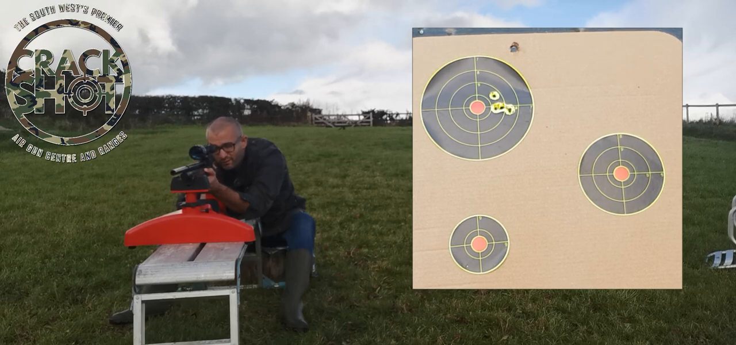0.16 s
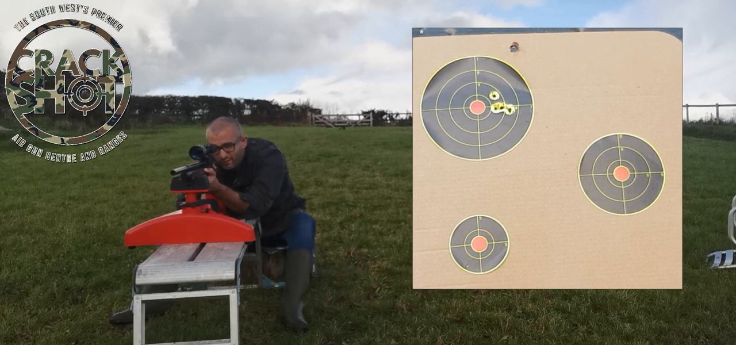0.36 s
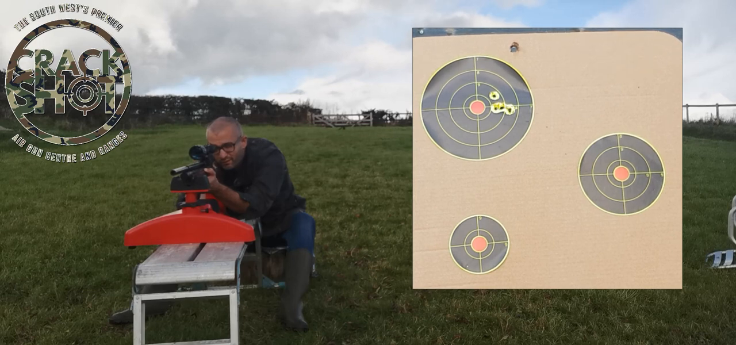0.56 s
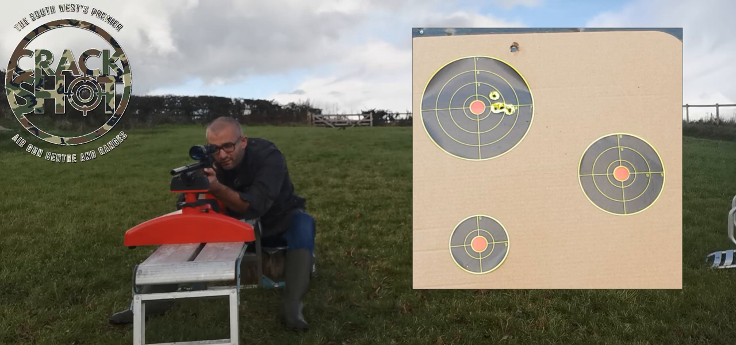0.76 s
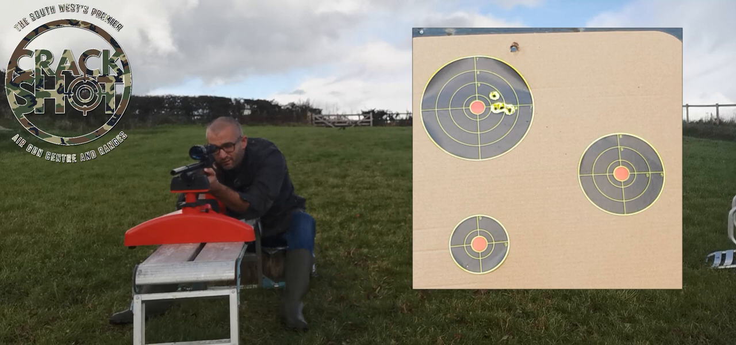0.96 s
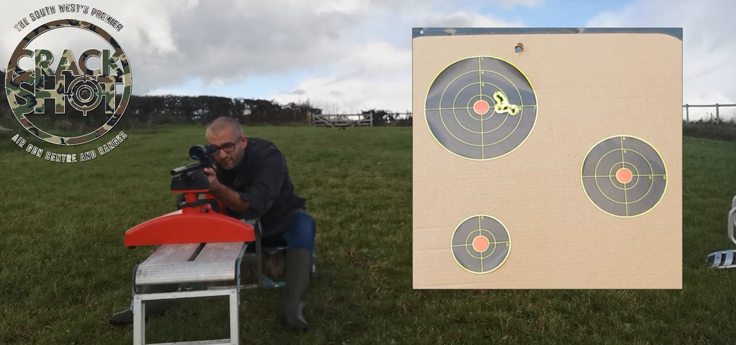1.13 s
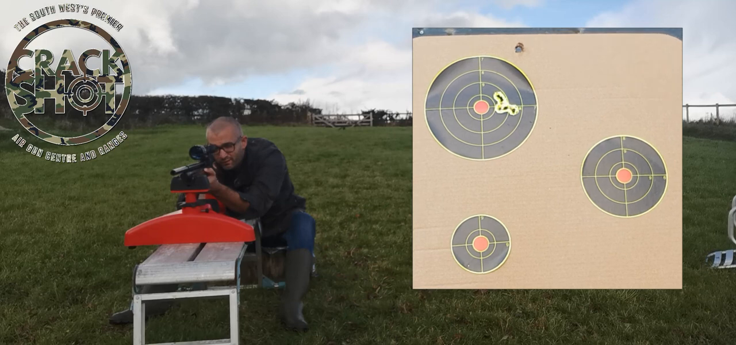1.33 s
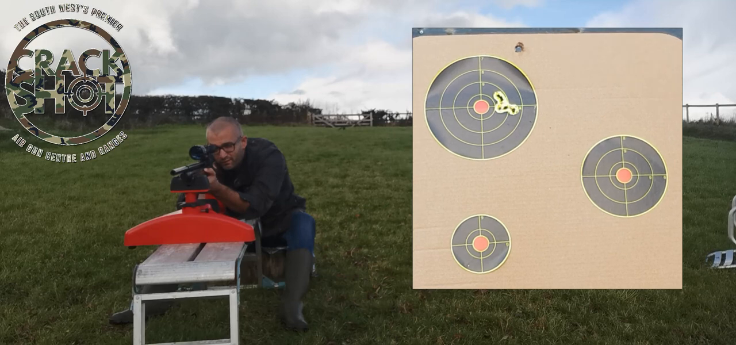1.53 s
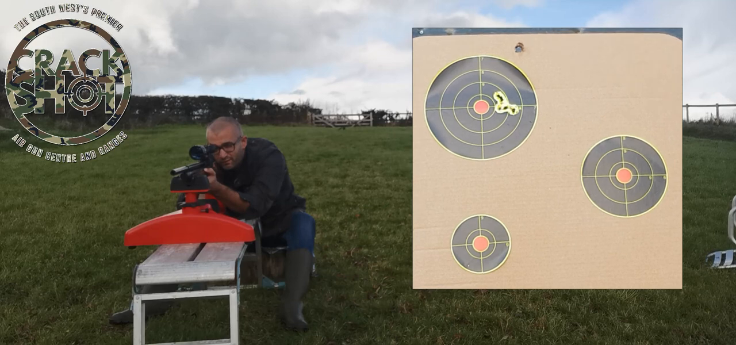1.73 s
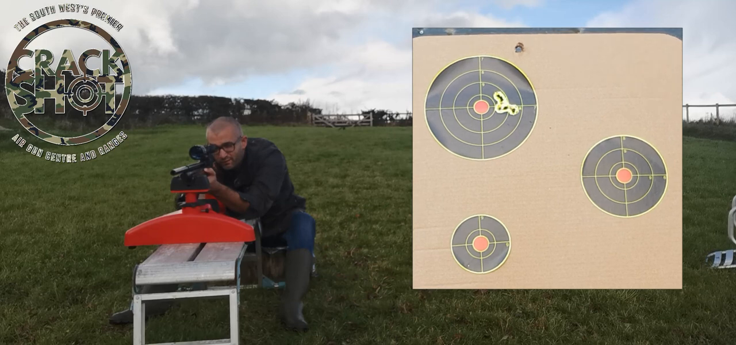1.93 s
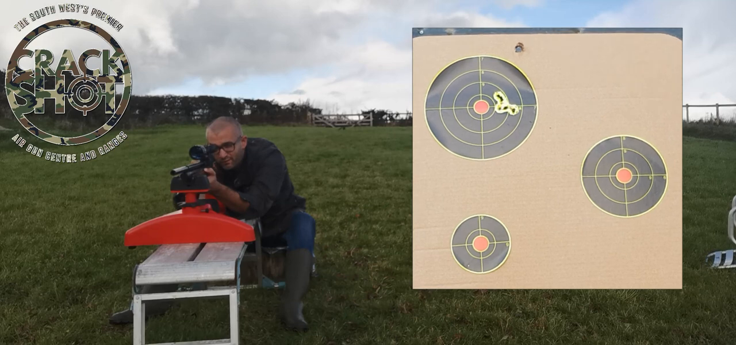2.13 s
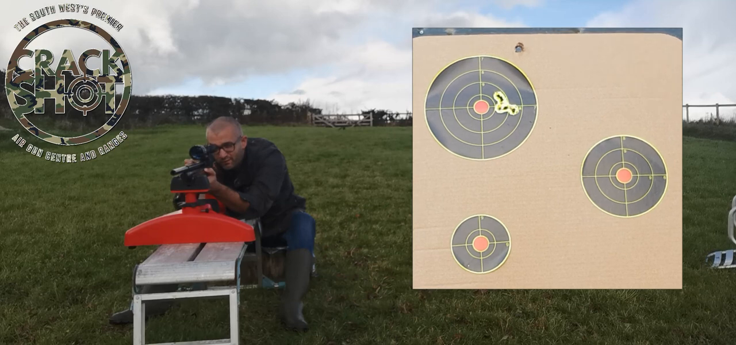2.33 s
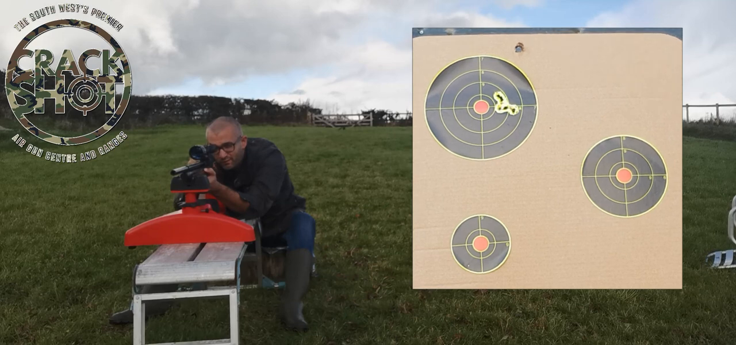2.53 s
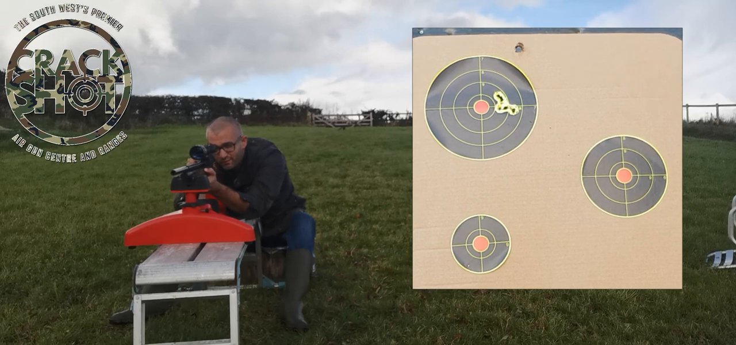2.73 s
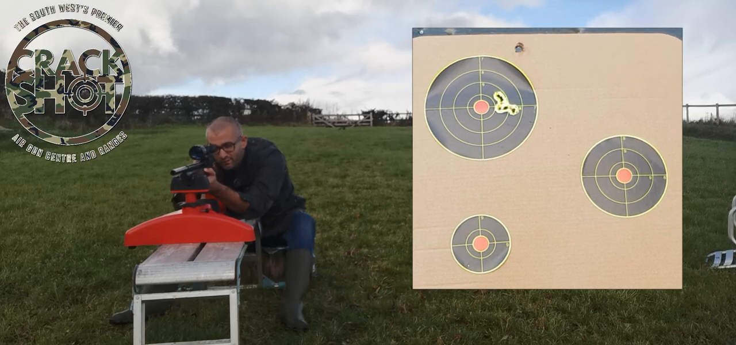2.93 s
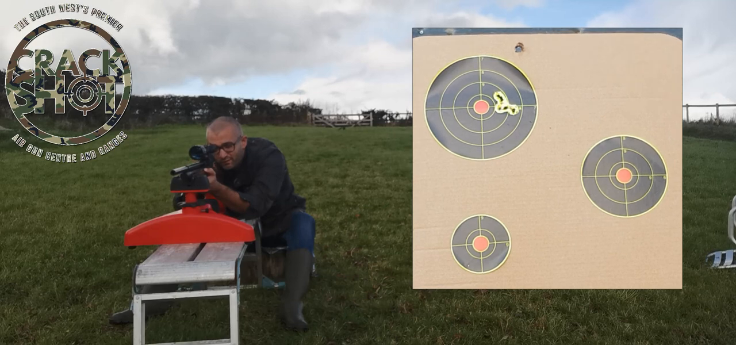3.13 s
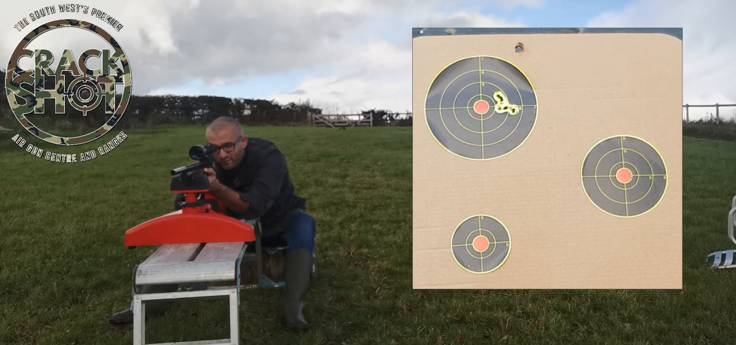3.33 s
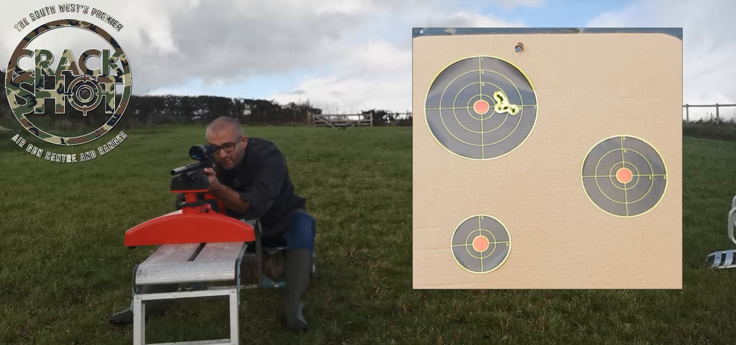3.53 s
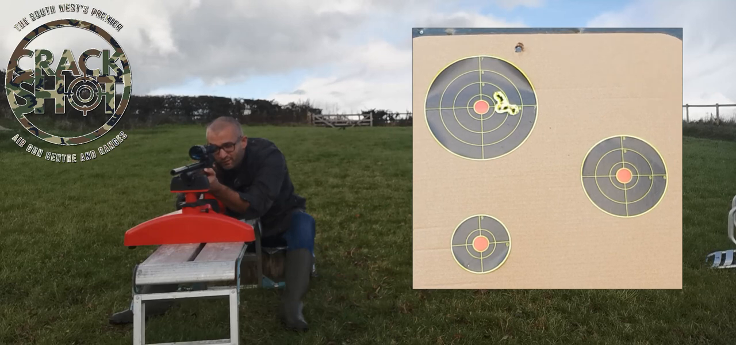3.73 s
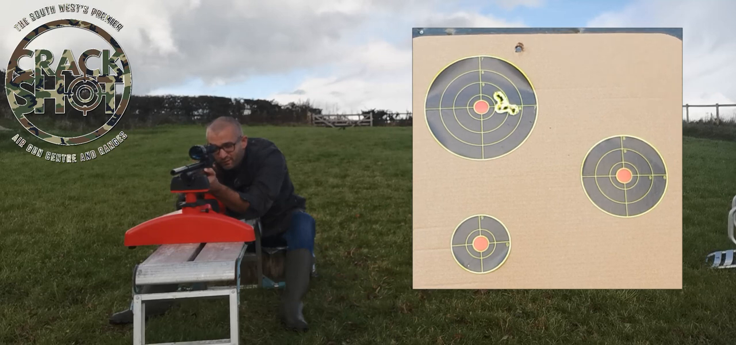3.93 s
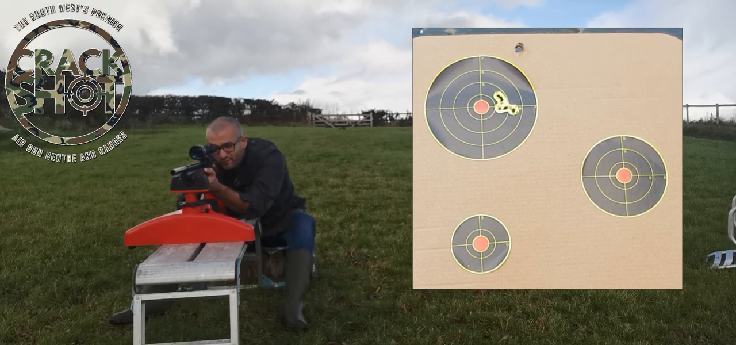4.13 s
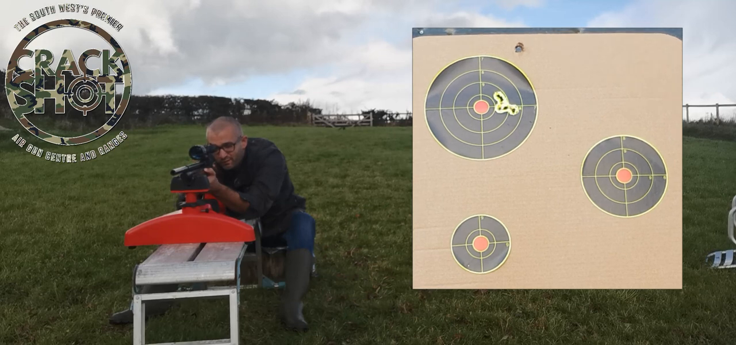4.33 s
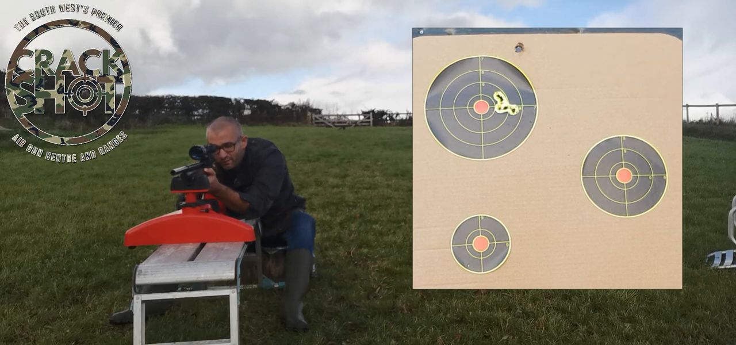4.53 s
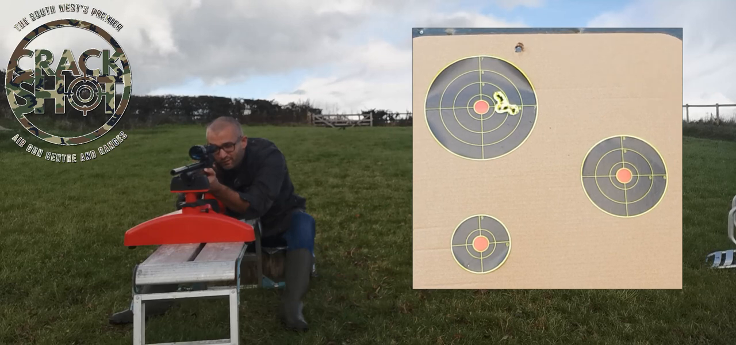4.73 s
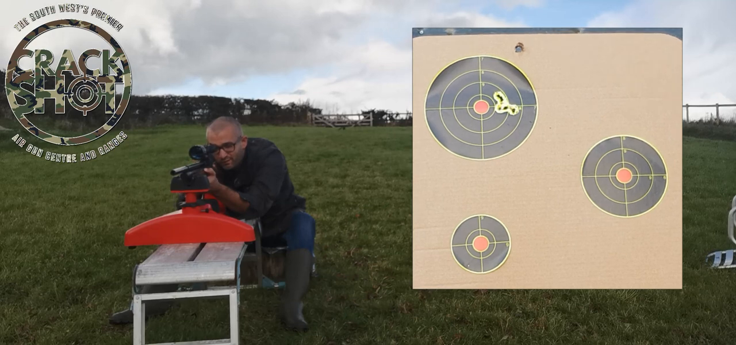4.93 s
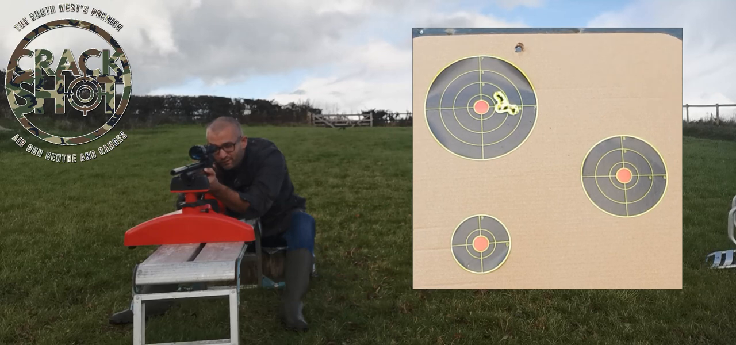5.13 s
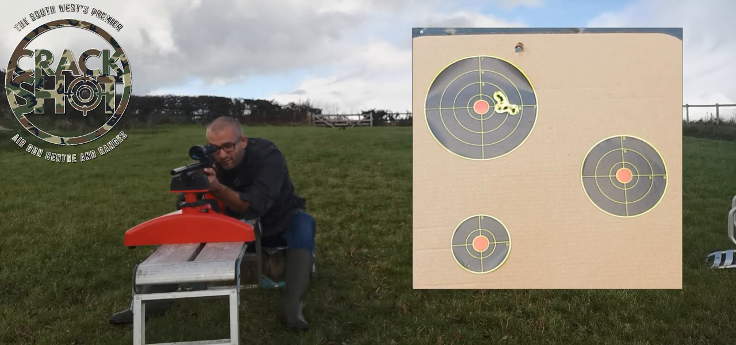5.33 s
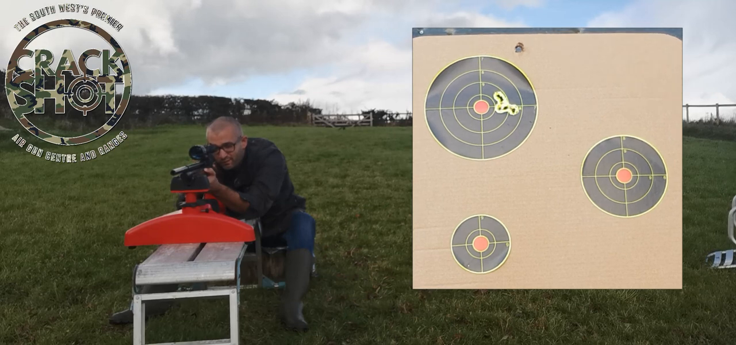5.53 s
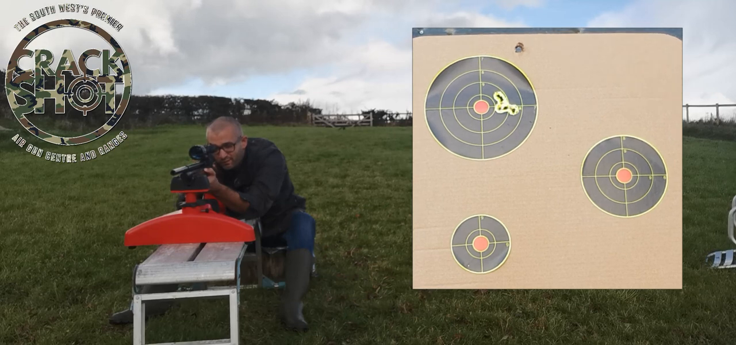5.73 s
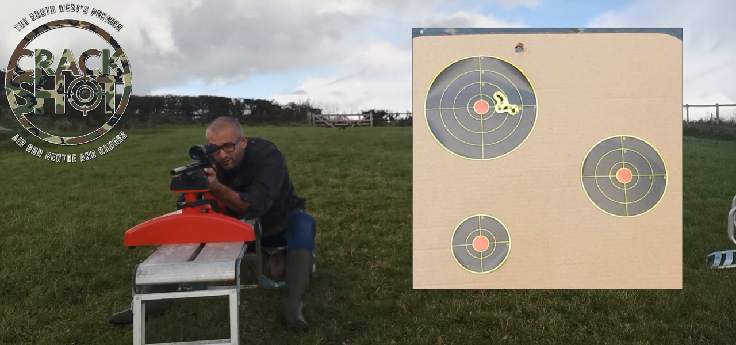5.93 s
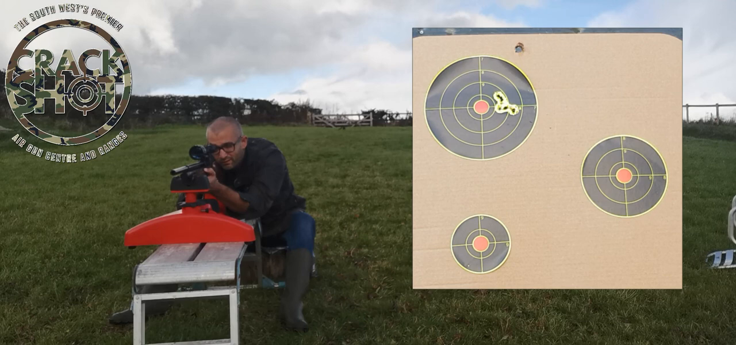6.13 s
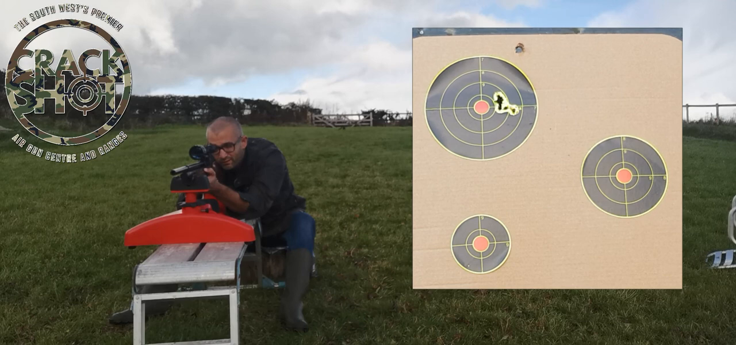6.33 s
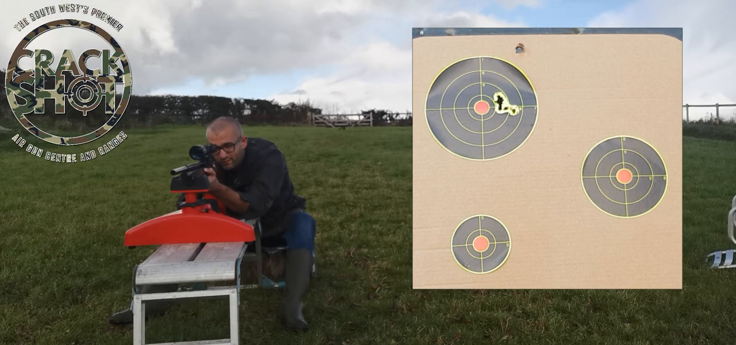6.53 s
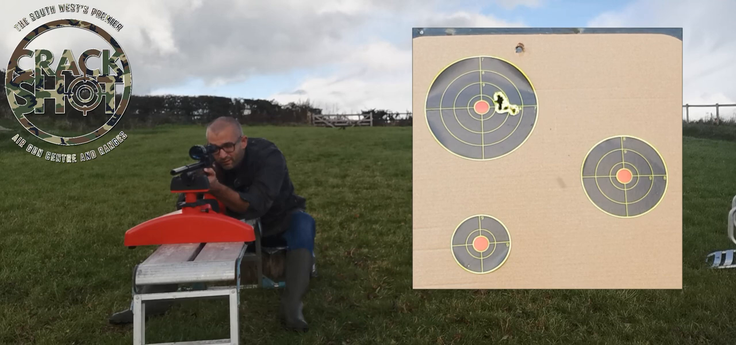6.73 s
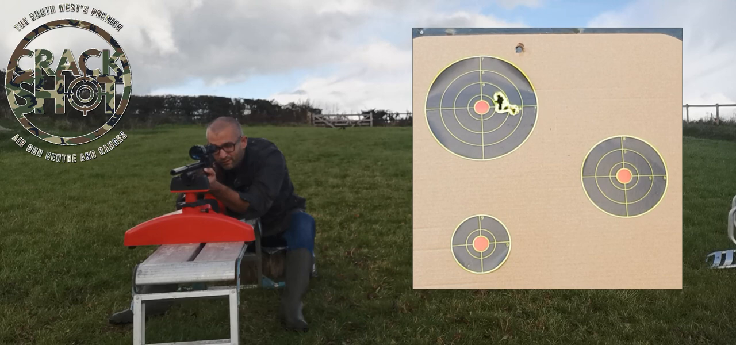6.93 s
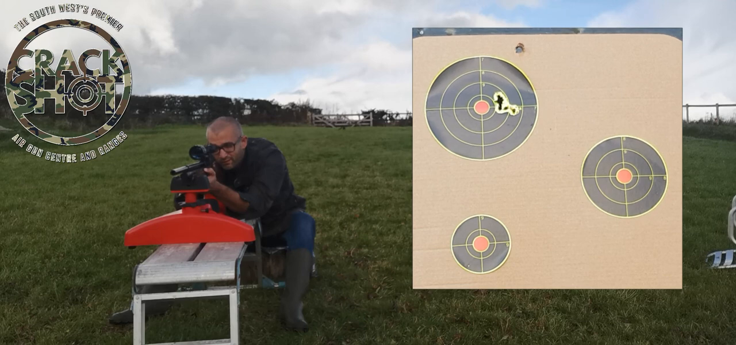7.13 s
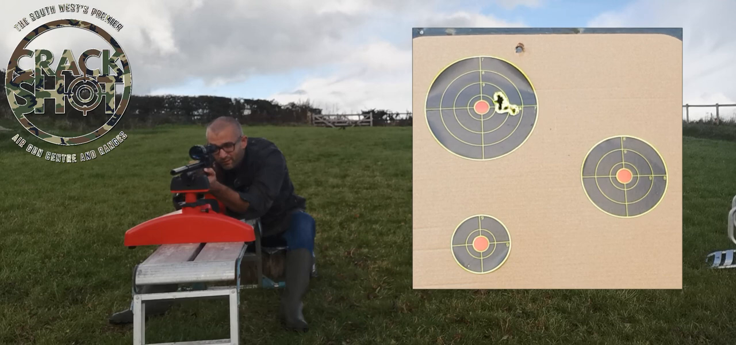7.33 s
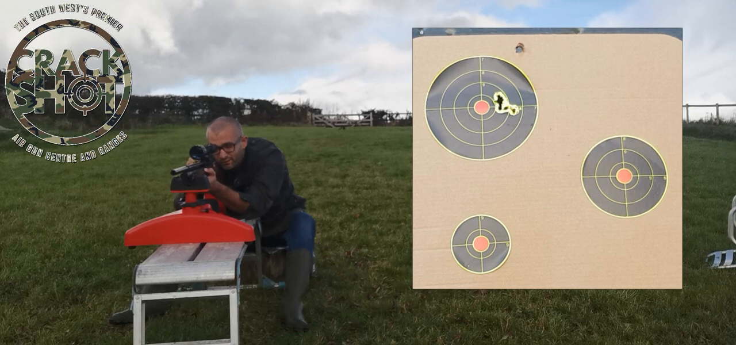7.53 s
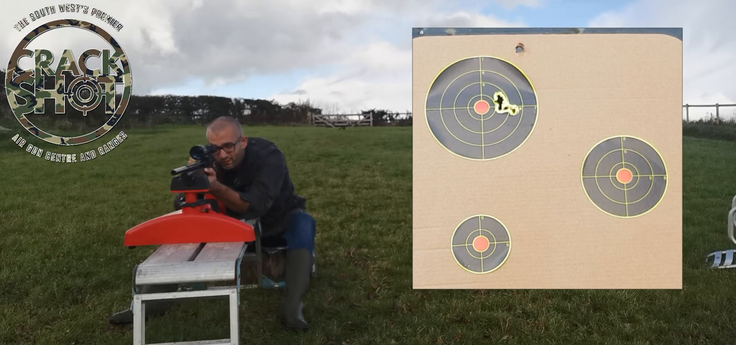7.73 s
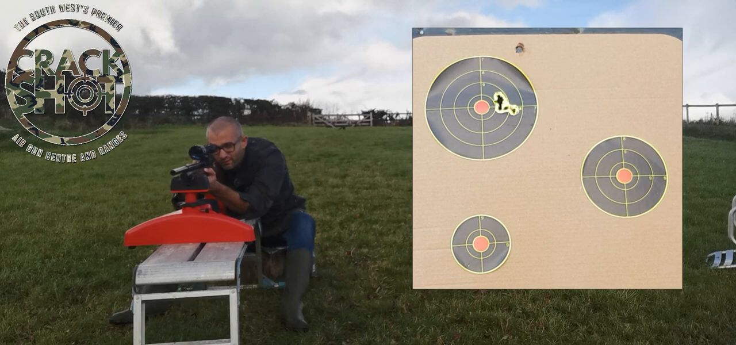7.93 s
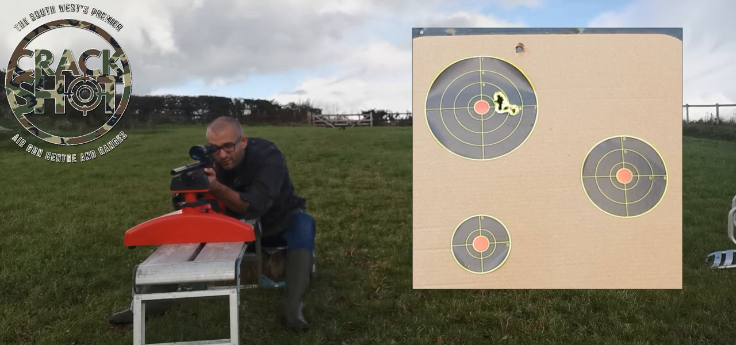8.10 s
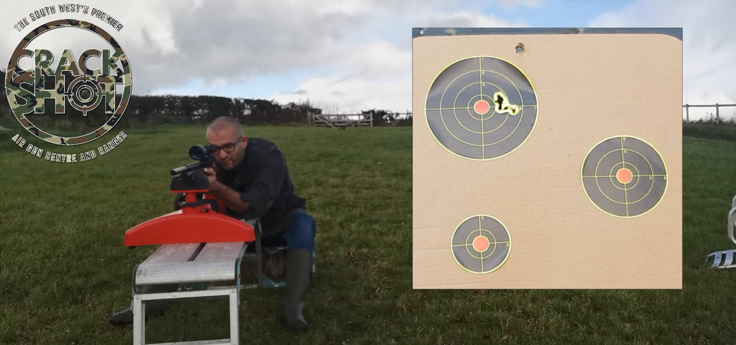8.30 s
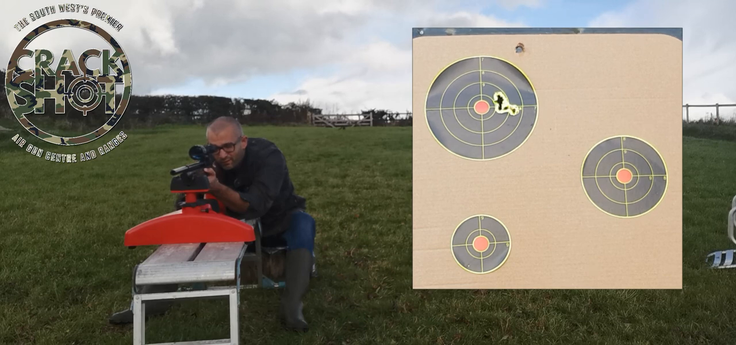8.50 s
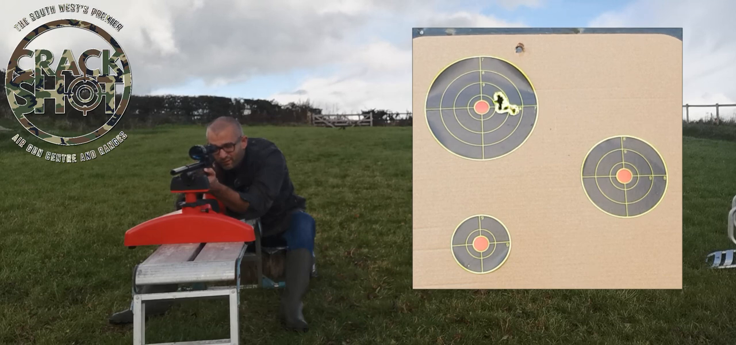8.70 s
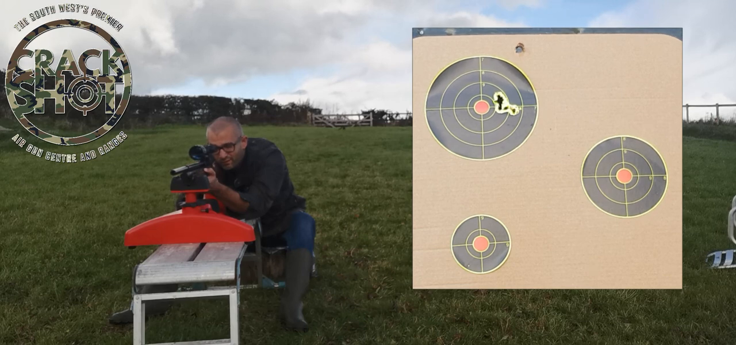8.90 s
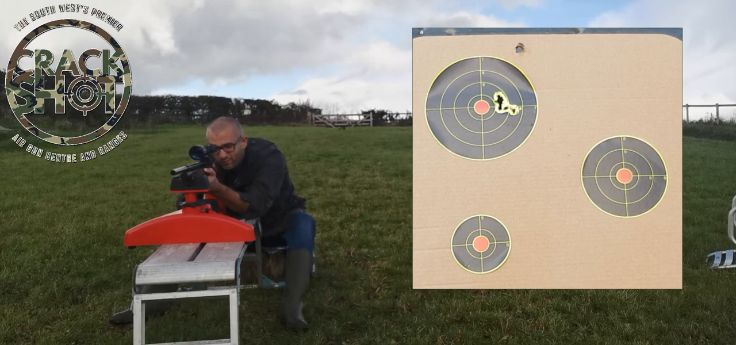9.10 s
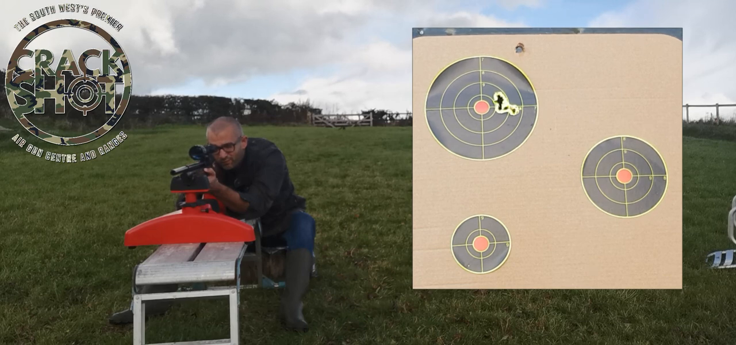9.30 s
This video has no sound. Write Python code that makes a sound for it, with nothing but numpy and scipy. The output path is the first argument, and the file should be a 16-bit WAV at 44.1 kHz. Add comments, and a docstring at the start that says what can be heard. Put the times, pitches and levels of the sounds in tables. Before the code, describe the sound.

Outdoors in an open, lightly windy field, an air rifle snaps close to a stereo microphone. A short hiss rushes in and the pellet slams into a steel trap with a roaring clang that dulls quickly. The rifle is cocked with clicks and a woody knock. After a quiet gap with bird chips, a second shot hits brighter, scattering rattling scraps, and cocking follows again.

```python
"""In a windy field an air rifle is fired twice: sharp cracks, filtered impulses, then their delayed repeat.
Each pellet nears as a swelling hiss and slams into a steel trap: banded noise, damped modes and a thump.
Scraps bounce as decaying noise bursts; cocking clicks, rings and knocks follow each shot. A bird chips in
rising sweeps over a faint hum, low wind swings and a shaped-noise hush. The loud sounds overload the input."""
import sys
import numpy as np
from scipy import signal
from scipy.fft import rfft, irfft, next_fast_len
from scipy.io import wavfile
from scipy.ndimage import uniform_filter1d

SR = 44100
rng = np.random.default_rng(int(sys.argv[2]) if len(sys.argv) > 2 else 0)


def output_pcm(signal):
    """Save a mono or channel-first signal as 16-bit PCM at the path in sys.argv[1].

    Samples are clipped to [-1, 1] before scaling.
    """
    pcm = np.clip(np.atleast_2d(signal).T, -1, 1) * 32767
    wavfile.write(sys.argv[1], SR, np.round(pcm).astype(np.int16))


def field_ratio(decibels):
    """Amplitude ratio for a level in dB (20 dB per decade); scalars and array-likes work."""
    return 10 ** (np.asarray(decibels, dtype=float) / 20)


N = 412599  # length in samples

# All levels are nominal, ahead of each function's fixed offsets.
# spectrum of the hush: frequency_hz, density_db (per Hz)
HUSH_SPECTRUM = [(20, -6), (40, -5), (80, -2), (125, -4), (170, -11.5), (330, -10.5), (500, -7.5),
                 (950, -5.5), (1600, -15), (2800, -23), (4600, -30), (8500, -36), (14500, -31.5),
                 (16000, -30)]
# slow swell of the wind rumble: time_s, gain_db
RUMBLE_SWELL = [(0, 0), (1, 3), (2.3, 1.5), (4, -3), (5, -.5), (6, -.5), (7.6, 3), (9.36, 1)]
# level of the hum: time_s, level_db
HUM_LEVEL = [(4.8, -90), (5.7, -78), (6.8, -74.5), (8.7, -76), (9.36, -82)]
# strong wind buffets: start_s, level_db, swing_hz, left_right_db
BUFFETS = [(1.85, -48, 115, 21.5), (2.016, -56.5, 127, 24), (2.181, -54, 117.9, 24), (2.268, -54, 65, 22),
           (2.361, -53, 56, -15.5), (3.385, -55, 101.7, -22), (3.452, -53, 83.6, -17),
           (6.977, -50, 90, -17), (7.246, -55.5, 72.7, -19), (7.331, -52, 62, -17),
           (7.41, -48.5, 102, -18.5), (8.781, -50, 114, -4), (9.092, -54, 64.3, -3)]
# bird chips: start_s, level_db
CHIPS = [(4.4831, -62), (4.621, -60), (4.7506, -65), (8.5839, -59.5), (8.7661, -58), (8.9231, -59),
         (9.269, -63)]
# when each part snaps, one row a cocking: start_s for each part
COCKING_TIMES = [(2.579, 2.6963, 2.7647, 2.8604, 2.925, 2.9492, 3.0406, 3.0979, 3.168, 3.1989),
                 (7.636, 7.739, 7.8074, 7.9138, 7.9795, 8.0037, 8.0911, 8.1462, 8.2151, 8.23)]
# parts that snap in turn: ring_level_db, left_right_db, tick_re_ring_db, knock_re_ring_db, knock_hz
ACTION_PARTS = [(-58, -5, 4.5, 2, 1935), (-41.5, -7.5, -7, -19, 2000), (-66, 0, 7, -6, 2200),
                (-46.5, -3, -3, -1.5, 1580), (-72, -2, 17, -4, 2500), (-69, -3, 15, -6, 4200),
                (-68, -1.5, 15, -6, 3500), (-36, -5.5, -4, -8.5, 960), (-62, -1.5, 10.5, 5, 2240),
                (-68, 0, 7, 2, 3500)]
# resonances of the action, ring then tick: centre_hz, width_hz, t60_s, pan_share (ratio)
ACTION_RESONANCES = [(7310, 1600, .032, 1.32), (3500, 7100, .025, .3)]
# scraps landing with a broad hiss: start_s, level_db, centre_hz, t60_s, left_right_db
SCRAPS = [(1.383, -57, 9000, .05, -1.5), (1.403, -48.5, 6814, .08, 2), (6.549, -38, 9505, 0.14, 1),
          (6.652, -57, 11120, .05, -1), (6.672, -43.5, 10060, .11, 1), (6.7465, -42, 5460, 0.17, 1),
          (6.9, -33, 6954, .13, 0.5), (7.222, -49, 7370, .029, 7)]
# scraps that skid with a narrow hiss: start_s, level_db, centre_hz, t60_s, left_right_db
SKIDS = [(6.466, -27, 5840, .21, -9), (7.0123, -50.5, 6300, .08, -10.5), (7.038, -54, 6300, .08, -12)]
# scraps that ring near one note, the lowest a dull thud: start_s, level_db, centre_hz, t60_s, left_right_db
CLANKS = [(1.715, -55.5, 2465, .054, 3.5), (1.81, -61, 2320, 0.19, -4.5), (6.46, -40, 97, 0.32, 4),
          (6.7465, -36, 2800, 0.42, 1), (6.9, -29.5, 1436, .067, 5), (6.912, -33.5, 1670, 0.19, 1),
          (7.214, -52, 3281, .035, 4.5)]
# spectrum of the nearing hiss: frequency_hz, density_db (per Hz)
WAKE_SPECTRUM = [(300, -9), (500, -1), (900, -15.5), (3000, -9.5), (8000, -10), (13000, -8), (16000, -12.5)]
# nearing pellets: end_s, level_db, treble_tilt_db (about, per decade)
WAKES = [(1.066, -28.5, 0), (6.349, -32, 3.5)]
# roar of the struck trap and its echoes, one table a hit: time_s, level_db
ROAR_LEVELS = [
    [(1.0665, -8.5), (1.12, -18.5), (1.19, -17), (1.245, -22), (1.38, -34), (1.57, -49.5), (1.8, -65.5),
     (2.0, -73)],
    [(6.3545, -9.5), (6.378, -19), (6.412, -18), (6.45, -21), (6.48, -26), (6.55, -31), (6.74, -48.5),
     (6.89, -54), (7.1, -63.5)],
]
# spectrum of the roar at its start: frequency_hz, density_db (per Hz)
ROAR_SPECTRUM = [(29, -51.5), (50, -33), (210, -27), (380, -14.5), (586, -3), (729, -6.5), (950, -7),
                 (1100, -8.5), (3030, -10.5), (4560, -20.5), (5270, -15), (8540, -26), (12300, -23),
                 (16000, -27)]
# how much of the treble loss each frequency takes: frequency_hz, loss_share (ratio)
TREBLE_LOSS_SHARE = [(100, -0.5), (300, -0.16), (800, 0.24), (2000, 0.42), (3000, 0.9), (6000, 1),
                     (13000, 4)]
# modes of the steel: mode_hz, level_db, base_t60_s (scaled for each hit)
STEEL_MODES = [(303, -26, 2.1), (383, -10, 1), (449, -9, 1), (531, -8.5, 1.3), (583.2, -1, 0.42),
               (647.5, -17, 1.6), (745, -10, 1.5), (803, -6.5, 0.62), (853, -14.5, 1.5), (948, -14, .65),
               (1018, -4.5, 1.1), (1262, -9, .33), (1530, -19.5, .65), (1930, -22, .8)]
# how each hit rings and dulls: ring_db, t60_factor (ratio), treble_loss_db_per_s, greatest_loss_db
BLOWS = [(-20.5, 0.93, 88.5, 59), (-23, .6, 86, 16)]
# low thump of each hit: pitch_hz, level_db, t60_s
THUMPS = [(90, -24.5, 0.13), (330, -10.5, 0.069)]
# rifle shots: start_s, level_db
SHOTS = [(0.8776, -6), (6.1653, -5)]
# cracks of one shot, its repeat and a later echo: delay_s, level_db, centre_hz, rattle_t60_s, push_re_crack_db
CRACKS = [(-.0017, -13.5, 2440, .009, -7), (0, -2, 5472, .012, -16), (.0017, -4.5, 4936, .015, -28.5),
          (.0052, -3.5, 5353, .012, -15.5), (.0068, -8.5, 4499, .015, -17), (.0103, -30, 3950, .03, 0),
          (0.0661, -26, 2520, .011, 4), (.068, -9.5, 3733, .012, -11), (0.0731, -7.5, 2727, .024, -16.5),
          (0.0782, -16.5, 2805, .06, -11), (.097, -23, 3797, .03, -8), (0.1008, -22.5, 2995, .027, -23),
          (.107, -25, 2805, .042, -17)]
# the field's wash after a shot: delay_s, level_db, centre_hz, width_hz, t60_s
WASHES = [(.02, -50.5, 4492, 7030, .5), (.075, -34, 9001, 14000, .3), (.075, -38, 480, 350, .2)]


def evened(x):
    """Normalisation to unit root-mean-square value."""
    return x / np.sqrt(np.mean(x ** 2) + 1e-20)


def read(points, hz):
    """Interpolation of a spectrum along logarithmic frequency."""
    f, value = np.transpose(points)
    return np.interp(np.log(hz + 1), np.log(f + 1), value)


def add(mix, s, sound):
    """Superposition: a sound is summed in from time s on."""
    part = mix[:, round(s * SR):][:, :sound.shape[1]]
    part += sound[:, :part.shape[1]]


def sides(pan_db):
    """Level difference between left and right, split evenly."""
    return field_ratio([[pan_db / 2], [-pan_db / 2]])


def slow_noise(shape, size):
    """Random fluctuation: noise smoothed twice over size samples, at unit rms."""
    once = uniform_filter1d(rng.standard_normal(shape), size=size)
    return evened(uniform_filter1d(once, size=size))


def pair(size, same, lead):
    """Partial coherence: noise spectra at two microphones, the left ahead by lead samples."""
    a, b = rfft(rng.standard_normal((2, size)))
    same = np.clip(same, 0, 1)
    late = np.exp(-2j * np.pi * np.fft.rfftfreq(size) * lead)
    return np.array([a, same * a * late + np.sqrt(1 - same ** 2) * b])


def band(x, hz, width):
    """Two-pole resonance of the given width in Hz."""
    return signal.lfilter(*signal.iirpeak(min(hz, .4 * SR), hz / width, SR), x)


def low_cut(x, hz):
    """Second-order high-pass filtering."""
    return signal.lfilter(*signal.butter(2, hz, "high", fs=SR), x)


def burst(hz, width, t60, pan_db, same, lead, rise=0.00031):
    """Exponential decay of noise through two cascaded resonances, with a quick rise in seconds."""
    size = int(1.3 * t60 * SR) + 200
    t = np.arange(size) / SR
    noise = irfft(pair(size, same, lead), size)
    noise = evened(band(band(noise, hz, width), hz, 0.44 * width))
    return noise * field_ratio(-60 * t / t60) * (1 - np.exp(-t / rise)) * sides(pan_db) / 2


def hush():
    """Spectral shaping of noise: a far wash, slightly to the left, over lumpy wind rumble that swells."""
    size = next_fast_len(N)
    hz, t = np.fft.rfftfreq(size, 1 / SR), np.arange(N) / SR
    same = read([(40, 0.23), (300, 0.78), (2000, 0.59), (8000, 0.2)], hz)
    z = pair(size, same, 19) * field_ratio(read(HUSH_SPECTRUM, hz))
    low = 1 / (1 + (hz / 170) ** 4)
    high = 1 - 1 / (1 + (hz / 3500) ** 4)
    s, swell_db = np.transpose(RUMBLE_SWELL)
    rumble_db = np.interp(t, s, swell_db) + 1.5 * slow_noise((2, N), 1500)
    rumble = irfft(z * low, size)[:, :N] * field_ratio(rumble_db)
    wash = irfft(z * (1 - low) * (1 - high), size)[:, :N]
    microphone_hiss = irfft(z * high, size)[:, :N]
    return field_ratio(-64) * sides(1.4) * evened(rumble + wash + microphone_hiss)


def hum():
    """Frequency and amplitude modulation: a faint low tone that wavers."""
    centre_hz, waver_hz, waver_db = 131, 3.3, 1.7  # wavers are rms
    s, db = np.transpose(HUM_LEVEL)
    waver = slow_noise((2, N), 3000)
    turns = np.cumsum(centre_hz + waver_hz * waver[0]) / SR
    level_db = np.interp(np.arange(N) / SR, s, db, left=-120) + waver_db * waver[1]
    return np.sqrt(2) * field_ratio(level_db) * np.sin(2 * np.pi * turns)


def wind():
    """Near-field pressure: single low swings that strike one microphone more than the other."""
    out = np.zeros((2, N))
    weak_count, weak_db = 6, -65  # weak buffets are scattered at random
    draws = rng.random((weak_count, 3))
    weak = [(a * N / SR, weak_db, 60 + 60 * b, 20 * c - 10) for a, b, c in draws]
    for s, db, hz, pan_db in BUFFETS + weak:
        u = np.linspace(0, 1, int(1.8 * SR / hz))
        swing = np.sin(2 * np.pi * 1.78 * u) * np.sin(np.pi * u) ** 2
        add(out, s, field_ratio(db - 7.0) * swing * sides(pan_db))
    return out


def bird():
    """Swept tone in a diffuse field: brief rising chips amid a faint fluttering twitter."""
    t, out, hz = np.arange(300) / SR, np.zeros((2, N)), 7140
    repeat_s, repeat_db, stray_s, stray_db = .0155, -14, .09, -8
    chip = np.sin(2 * np.pi * np.cumsum(hz * (.83 + 50 * t)) / SR) * np.hanning(len(t))
    chip_pair = np.array([0.34 * chip, 1.76 * np.roll(chip, 19)])
    for (start, level_db), stray in zip(CHIPS, rng.uniform(-1, 1, len(CHIPS))):
        calls = [(start, level_db),
                 (start + repeat_s, level_db + repeat_db),
                 (start + stray * stray_s, level_db + stray_db)]  # a stray chip before or after
        for s, db in calls:
            add(out, s - .003, field_ratio(db - 3.5) * chip_pair)
            add(out, s, field_ratio(db - 4) * burst(hz, 1500, .12, 1, .4, 21, rise=0.0017))
            add(out, s - .04, field_ratio(db - 18) * burst(hz, 800, .3, 1, .4, 19, rise=.01))
    return out


def cocking():
    """Impact excitation of small parts: a bright ring, a broad tick and a woody knock of the stock."""
    t, out = np.arange(900) / SR, np.zeros((2, N))
    knock_spread, knock_t60_s = 0.87, 0.058  # spread is width per Hz of centre
    rap_db, rap_t60_s = -2, 0.011  # the clean first swings of a knock
    for times in COCKING_TIMES:
        for s, (db, pan_db, tick_db, knock_db, knock_hz) in zip(times, ACTION_PARTS):
            for (hz, width, t60, side), share_db in zip(ACTION_RESONANCES, (0, tick_db)):
                click = burst(hz, width, t60, pan_db * side, 0.33, 6.6, rise=0.00026)
                add(out, s, field_ratio(db + share_db) * click)
            rap = np.sin(2 * np.pi * knock_hz * t) * field_ratio(rap_db - 60 * t / rap_t60_s) * np.ones((2, 1))
            add(out, s + .001, field_ratio(db + knock_db) * rap)
            knock = burst(knock_hz, knock_spread * knock_hz, knock_t60_s, -1, 0.48, 6.3, rise=0.001)
            add(out, s, field_ratio(db + knock_db) * knock)
    return out


def scraps():
    """Bandwidth sets tonality: bouncing bits of pellet and trap hiss, skid, clank and thud."""
    out = np.zeros((2, N))
    for rows, spread in ((SCRAPS, 1.7), (SKIDS, 0.45), (CLANKS, 0.29)):  # width per Hz of centre
        for s, db, hz, t60, pan_db in rows:
            add(out, s, field_ratio(db) * burst(hz, spread * hz, t60, pan_db, 0.33, 36, rise=.0006))
    return out


def wakes():
    """Level grows as distance shrinks: hiss and a faint falling whistle swell as each pellet closes in."""
    size, out = 5500, np.zeros((2, N))
    whistle_db, end_hz, fall_hz_per_s, grow_db_per_s = -16.5, 480, 1300, 90
    ahead = np.arange(size)[::-1] / SR  # seconds left before the hit
    hz = np.fft.rfftfreq(size, 1 / SR)
    swell = 0.014 / (ahead + 0.019) * np.minimum(ahead / 0.0025, 1)  # stops at the hit
    for s, db, tilt_db in WAKES:
        spectrum_db = read(WAKE_SPECTRUM, hz) + tilt_db * np.log10(hz / 3000 + .1)
        hiss = evened(irfft(pair(size, 0.28, 30) * field_ratio(spectrum_db), size))
        turns = np.cumsum(end_hz + fall_hz_per_s * ahead) / SR
        whistle = np.sin(2 * np.pi * turns) * np.hanning(2 * size)[:size]
        whistle *= field_ratio(db + whistle_db - grow_db_per_s * ahead)
        add(out, s - size / SR, whistle * np.ones((2, 1)))
        add(out, s - size / SR, hiss * swell * field_ratio(db - 120 * ahead))
    return out


def trap_roar(rows, loss_db_per_s, most_db, t):
    """Frequency-dependent damping: crackling noise in twelve bands, the upper ones fading first."""
    size, hz = len(t), np.fft.rfftfreq(len(t), 1 / SR)
    s, level = np.transpose(rows)
    level_db = np.interp(t + s[0], s, level) - 80 * np.maximum(t + s[0] - s[-1], 0)
    loss_db = -np.clip(loss_db_per_s * (t - 0.034), 0, most_db)  # bright for the first 34 ms
    same = read([(200, 0.23), (700, 0.54), (3000, 0.13), (15000, 0.44)], hz)
    z = pair(size, same, 11) * field_ratio(read(ROAR_SPECTRUM, hz))
    z /= np.std(irfft(z * (hz > 300) * (hz < 1500), size))
    centres = np.log(np.geomspace(60, 15000, num=12))
    crackle = evened(uniform_filter1d(rng.standard_normal(size), size=60))  # fragments strike in clumps
    roar = np.zeros((2, size))
    for k, centre in enumerate(centres):
        share = np.interp(np.log(hz + 1), centres, np.arange(12) == k)
        own = evened(uniform_filter1d(rng.standard_normal(size), size=500))
        dull = read(TREBLE_LOSS_SHARE, np.exp(centre))
        flicker_db = 2.5 * np.clip(dull, 0, 1) * crackle + 2.2 * own
        roar += irfft(z * share, size) * field_ratio(level_db + dull * loss_db + flicker_db)
    return roar


def steel_modes(ring_db, damping, t):
    """Modal vibration: damped sines of the steel, reaching the right 11 samples late."""
    ring = np.zeros((2, len(t)))
    for (hz, db, t60), phase in zip(STEEL_MODES, rng.random(len(STEEL_MODES))):
        turns = hz * (t - np.array([[0], [11]]) / SR) + phase
        ring += field_ratio(ring_db + db - 60 * t / (t60 * damping)) * np.sin(2 * np.pi * turns)
    return ring


def low_thump(hz, db, t60, t):
    """Damped oscillation: a low tone and one inharmonic overtone, stronger on the left."""
    overtone, overtone_db = 1.7, -2
    turn = 2 * np.pi * hz * t
    tones = np.sin(turn) + field_ratio(overtone_db) * np.sin(overtone * turn)
    thump = tones * field_ratio(db - 60 * t / t60) * np.array([[1.3], [.7]])
    return low_cut(thump * (1 - np.exp(-t / 0.00079)), 0.6 * hz)


def impact(rows, blow, thump):
    """Superposition at the struck trap: roar, ringing modes, a first slam and a low thump."""
    ring_db, damping, loss_db_per_s, most_db = blow
    t = np.arange(int(1.6 * SR)) / SR
    body = trap_roar(rows, loss_db_per_s, most_db, t) + steel_modes(ring_db, damping, t)
    slam = np.sin(2 * np.pi * 750 * t) * field_ratio(1.5 - 60 * t / 0.0042)  # alike on both sides
    struck = body * (1 - np.exp(-t / 0.0007)) + slam
    return low_cut(low_cut(struck, 92), 92) + low_thump(*thump, t)


def shot():
    """Impulse response: each crack is a filtered spike with a short rattle and a low push of air."""
    spike, t, out = np.zeros((2, 900)), np.arange(900) / SR, np.zeros((2, N))
    spike[0, 0], spike[1, 7] = 1.07, .93  # the left hears it first
    push = np.sin(2 * np.pi * 520 * t) * field_ratio(-60 * t / 0.0059)
    crack_spread = 1.5  # width per Hz of centre
    rattle_db, rattle_follows = -15.5, 0.38  # the rattle changes by this share of the crack's dB
    treble_cut = signal.butter(3, 8500, fs=SR)
    for s, shot_db in SHOTS:  # both shots share the pattern
        for delay, db, hz, t60, push_db in CRACKS:
            width = crack_spread * hz
            crack = signal.lfilter(*treble_cut, band(spike, hz, width))
            add(out, s + delay, field_ratio(shot_db + db) * (crack / crack.max() + field_ratio(push_db) * push))
            rattle = burst(hz, width, t60, 0.88, 0.37, 2.1)
            add(out, s + delay, field_ratio(shot_db + rattle_db + rattle_follows * db) * rattle)
        for delay, db, hz, width, t60 in WASHES:
            add(out, s + delay, field_ratio(shot_db + db) * burst(hz, width, t60, 0.88, 0.65, 2.1))
    return out


def scene():
    """Linear superposition of the field's background, bird, scraps, pellets, trap and rifle."""
    mix = hush() + hum() + wind() + bird() + cocking() + scraps() + wakes()
    for rows, blow, thump in zip(ROAR_LEVELS, BLOWS, THUMPS):
        add(mix, rows[0][0], impact(rows, blow, thump))
    return mix + low_cut(shot(), 150)


def low_pass(x):
    """Removes everything above the highest recorded frequency."""
    return signal.sosfilt(signal.butter(12, 16800, fs=SR, output="sos"), x)


def record(dry):
    """Gain control and saturation: loud sounds lower the gain, which creeps back; the input overloads softly."""
    threshold_db, fall_db_per_s, gain_share = -30.5, 25.0, 0.071  # dB of gain lost per dB over
    power = signal.lfilter([.001], [1, -.999], (dry ** 2).mean(0))
    power_db = 10 * np.log10(power + 1e-12)
    fall_db = np.arange(N) * fall_db_per_s / SR
    held_db = np.maximum.accumulate(power_db + fall_db) - fall_db  # peaks held, then falling slowly
    over_db = np.maximum(held_db - threshold_db, 0)
    ducked = dry / field_ratio(gain_share * over_db)
    overloaded = .96 * np.tanh(ducked / 0.81)
    return low_pass(overloaded)


dry = scene()
out = record(dry)
output_pcm(out)
```